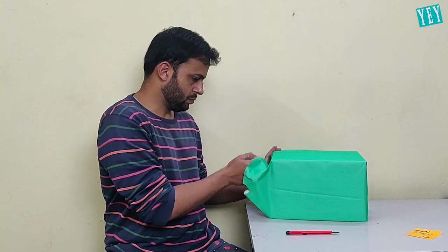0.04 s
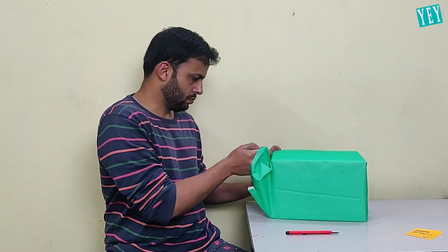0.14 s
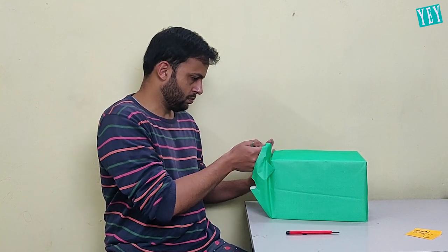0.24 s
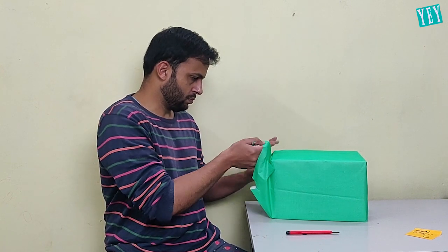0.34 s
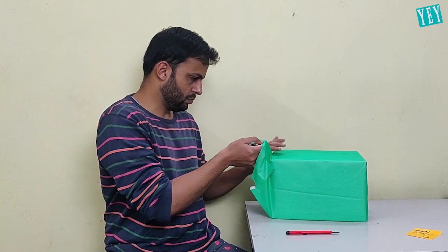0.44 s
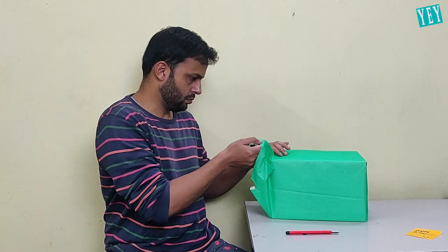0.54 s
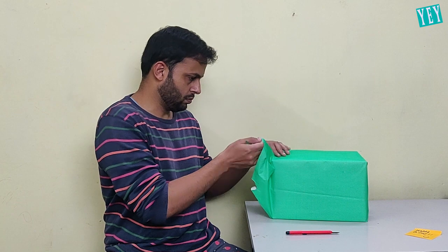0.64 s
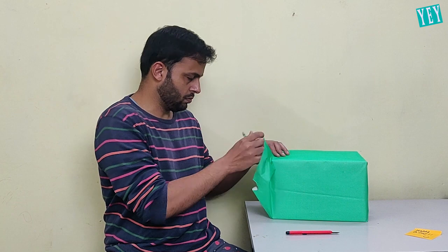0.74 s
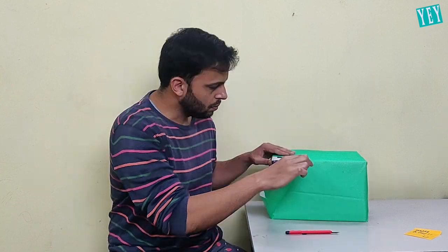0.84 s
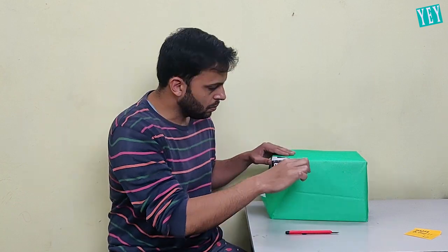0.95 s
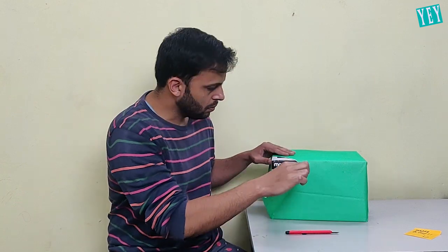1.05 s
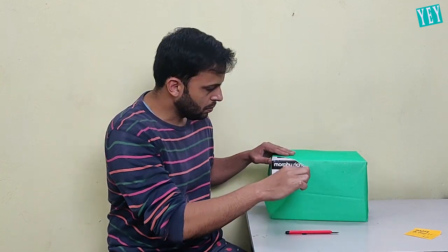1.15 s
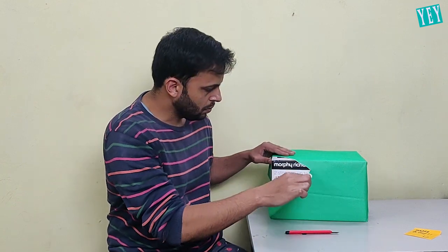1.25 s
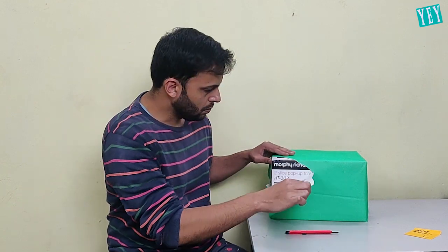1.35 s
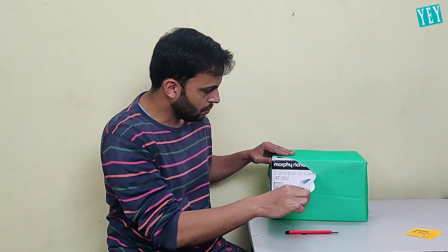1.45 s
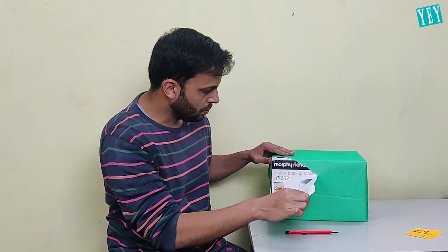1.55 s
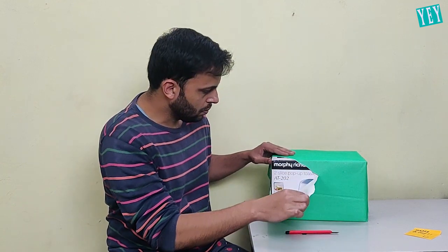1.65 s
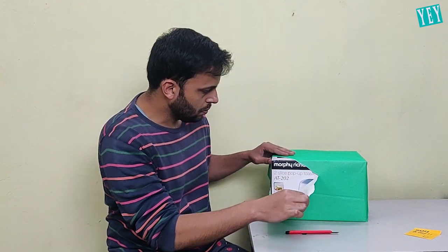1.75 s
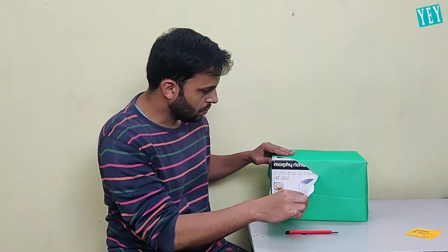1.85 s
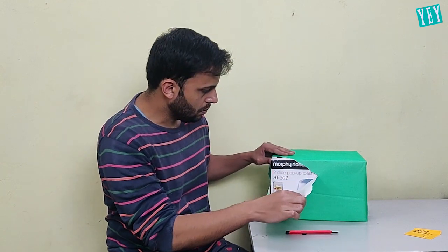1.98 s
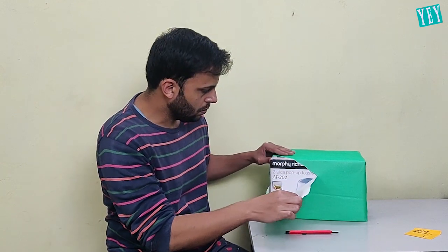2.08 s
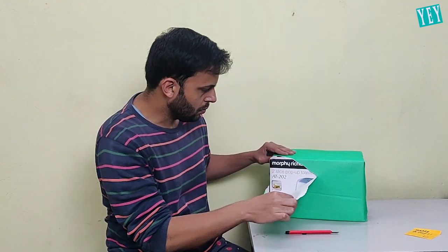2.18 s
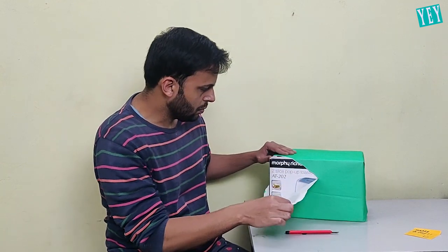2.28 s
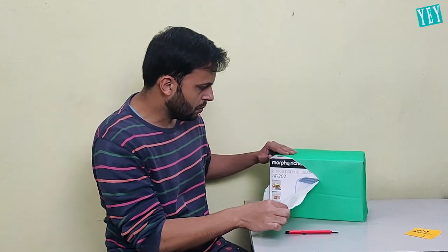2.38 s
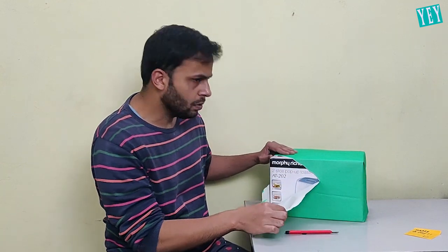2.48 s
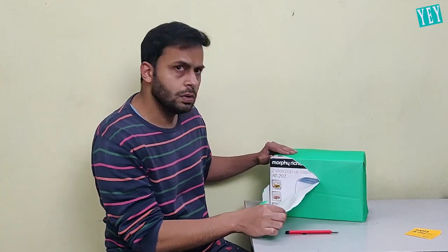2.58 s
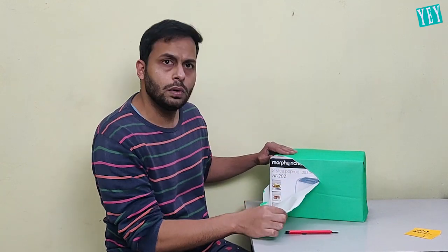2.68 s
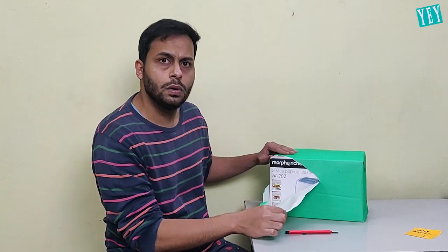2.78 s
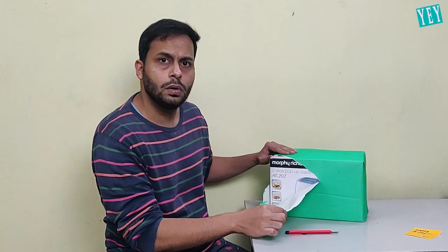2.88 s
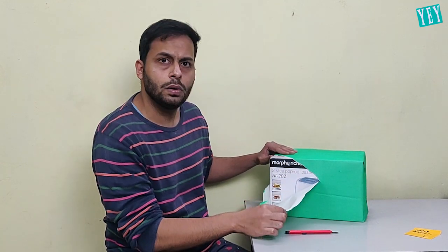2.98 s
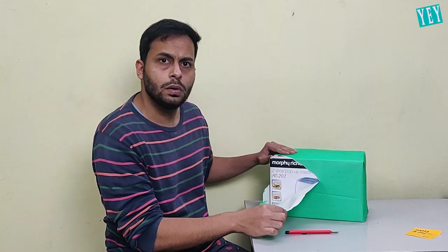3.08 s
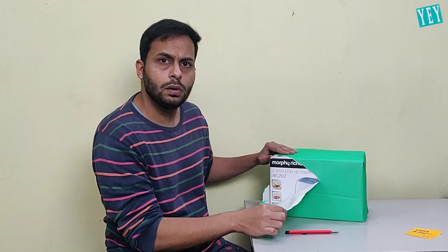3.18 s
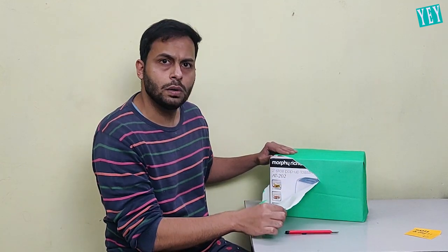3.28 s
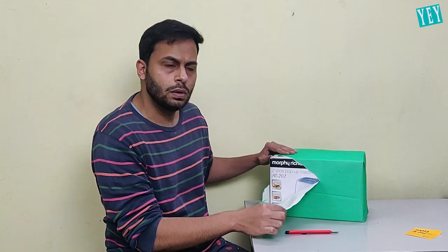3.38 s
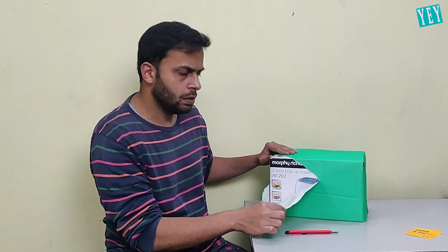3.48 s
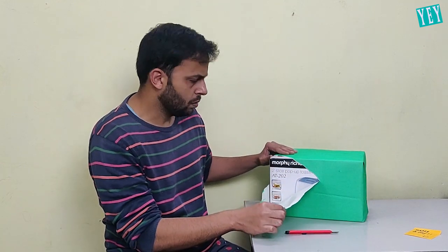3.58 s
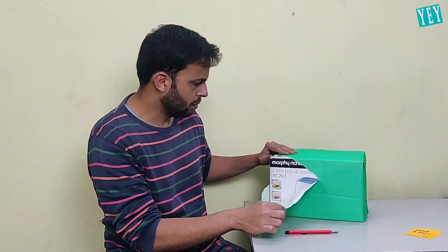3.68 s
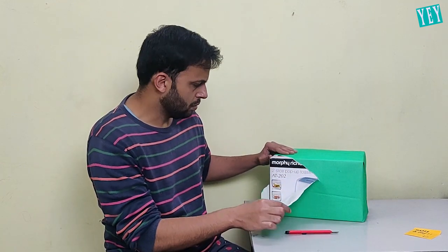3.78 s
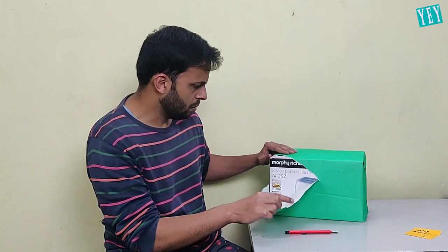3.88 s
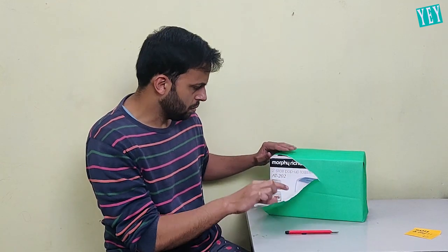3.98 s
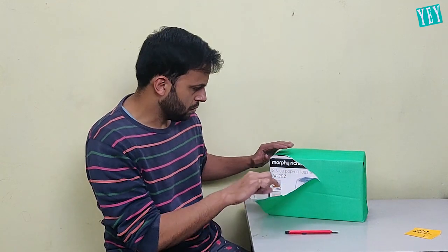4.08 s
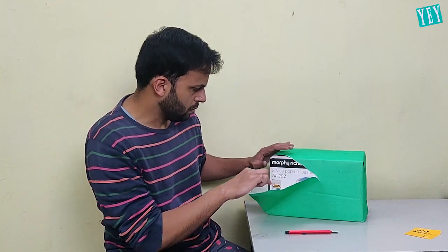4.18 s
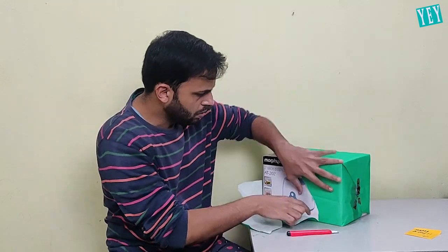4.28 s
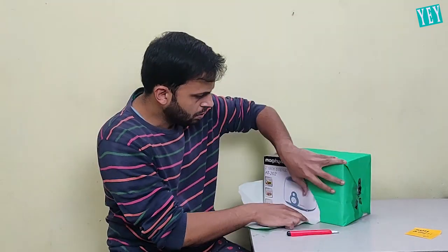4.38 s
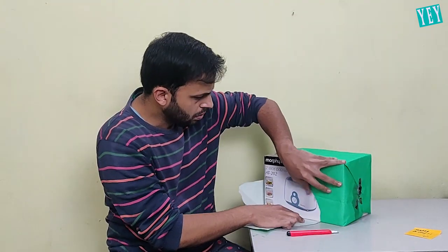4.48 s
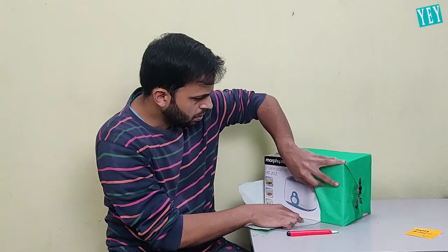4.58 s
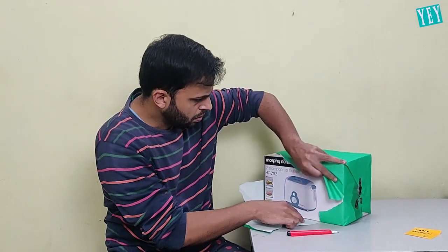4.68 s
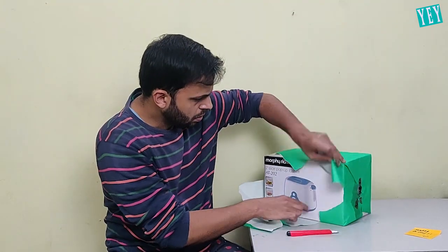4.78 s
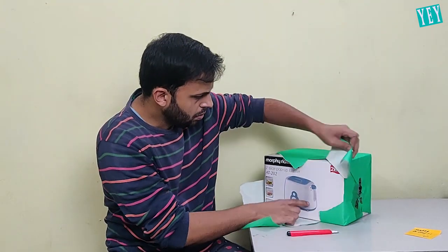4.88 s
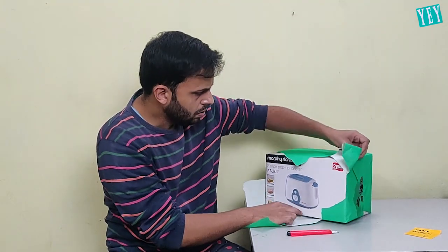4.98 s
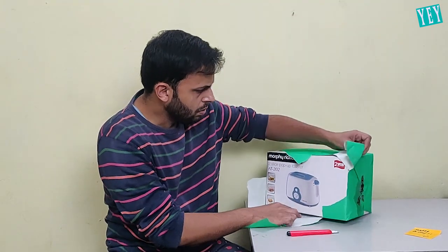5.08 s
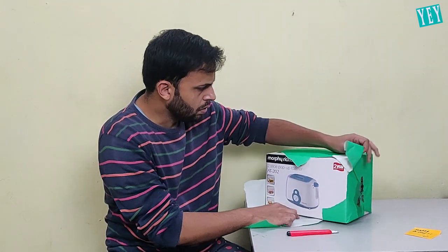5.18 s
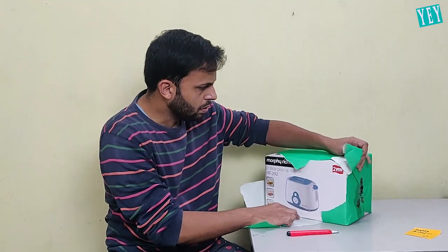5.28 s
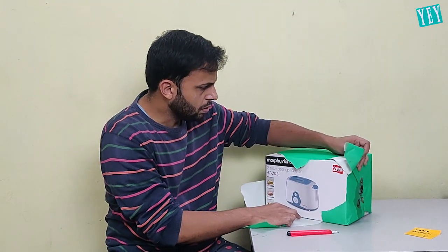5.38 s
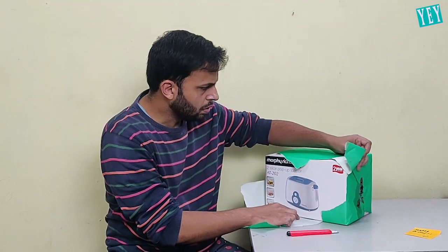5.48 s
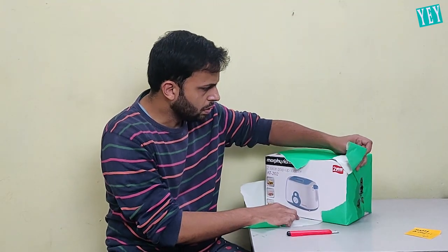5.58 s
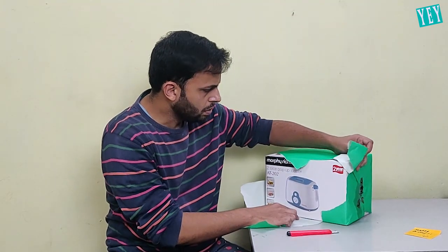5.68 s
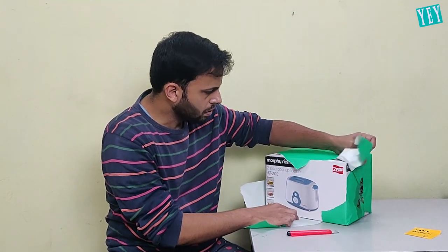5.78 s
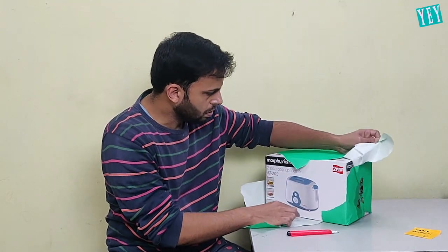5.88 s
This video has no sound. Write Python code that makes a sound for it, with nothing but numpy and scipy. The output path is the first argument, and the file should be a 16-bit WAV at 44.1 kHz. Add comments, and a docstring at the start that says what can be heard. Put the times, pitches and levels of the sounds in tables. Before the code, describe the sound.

Wrapping paper rustles open, cuts off abruptly, tears slowly twice, then is ripped off a cardboard box in two loud crackling jerks.

```python
"""Wrapping paper is pulled off a cardboard box on a table in a small bare room, over a faint low rumble.
A flap is unfolded until its sound stops short at 0.914 s; then two slow tears crackle down the side.
A hand grabs the sheet, rips it away in two strong jerks and handles it a little more.
Filtered noise of tiny fibre breaks is the sheet; short clicks are its snapping fibres and buckling creases.
Hollow knocks come from filtered impulses, and the box rings along through resonators."""
import sys
import numpy as np
from scipy import signal
from scipy.fft import rfft, irfft
from scipy.io import wavfile
from scipy.ndimage import uniform_filter1d

SR = 44100
rng = np.random.default_rng(int(sys.argv[2]) if len(sys.argv) > 2 else 0)


def generate_wav(sig):
    """Save sig (samples, or channels by samples) to the path in sys.argv[1] as 16-bit PCM at SR."""
    pcm = np.round(np.clip(np.atleast_2d(sig).T, -1, 1) * 32767).astype(np.int16)
    wavfile.write(sys.argv[1], SR, pcm)


N = 261895
TIME = np.arange(N) / SR
CUT_S = .914  # the unfolding and its echo stop abruptly here

# How the sheet radiates while it is ripped away. Each row: frequency in Hz, gain in dB.
RIP_COLOUR = [(29, -23), (50, -11), (145, -6), (246, 3.5), (408, -1), (729, 1), (1120, -0.5), (1210, -4),
              (1660, -5), (2060, -10.5), (2210, -11.5), (6870, -21.5), (8140, -21.5), (13800, -39),
              (16000, -40)]
# Band edges in Hz: a slack sheet has flapping, rustle and crackle between them.
SLACK_HZ = [45, 300, 2500, 18000]
# Band edges in Hz: a taut sheet has only rustle and crackle between them.
TAUT_HZ = [150, 2500, 18000]


def undb(db):
    """Decibels to gain."""
    return 10 ** (np.asarray(db) / 20)


def unit(x):
    """Scale to rms 1."""
    return x / np.sqrt(np.mean(x ** 2))


def add(track, s, sound):
    """Mix a sound into a track at time s."""
    start = int(s * SR)
    track[start:start + len(sound)] += sound[:N - start]


def colour(x, points):
    """Minimum-phase filter through (Hz, dB) points, built from the folded cepstrum."""
    size = 4096
    hz, db = np.transpose(points)
    bins = np.maximum(np.arange(size // 2 + 1) * SR / size, 1)
    gain = undb(np.interp(np.log(bins), np.log(hz), db))
    cepstrum = irfft(np.log(gain))
    cepstrum[1:size // 2] *= 2
    cepstrum[size // 2 + 1:] = 0
    impulse = irfft(np.exp(rfft(cepstrum)))
    return signal.fftconvolve(x, impulse)[:len(x)]


def band(x, lo_hz, hi_hz, order=3):
    """Butterworth band-pass, its upper edge kept below half the sample rate."""
    edges = [lo_hz, min(hi_hz, .47 * SR)]
    return signal.sosfilt(signal.butter(order, edges, "band", fs=SR, output="sos"), x)


def fall(t, t60):
    """Exponential decay that loses 60 dB in t60 seconds."""
    return np.exp(-np.log(1000) * t / t60)


def fade(t60):
    """The same decay as an envelope that ends after t60 seconds."""
    count = int(t60 * SR)
    return fall(np.arange(count), count)


def walk(rate):
    """Smooth random wander with spread near 1, through rate random points a second."""
    knots = rng.standard_normal(N // 20)
    return np.interp(TIME * rate, np.arange(len(knots)), knots)


def steady(x, span_s=0.11):
    """Even out the slow level and keep the grain."""
    count = int(span_s * SR)
    power = uniform_filter1d(uniform_filter1d(x ** 2, count), count)
    return x / np.sqrt(np.abs(power) + 1e-18)


def fibres(rate, spread_db, slip_db, slip_rate):
    """Rate tiny breaks a second, of unequal size, swelling and fading as the paper sticks and slips."""
    breaks = rng.random(N) < rate / SR
    sizes = undb(spread_db * np.minimum(rng.exponential(size=N), 4.5))
    signs = rng.choice([-1, 1], N)
    return breaks * sizes * signs * undb(slip_db * walk(slip_rate))


def table_bounce(x, lag_s=0.000695, sway_s=.00018, sway_hz=5, bounce=0.33):
    """The table top mirrors the moving sheet; the changing lag sweeps broad bands through its sound."""
    mirrored = np.interp(TIME - lag_s - sway_s * walk(sway_hz), TIME, x)
    return x + bounce * mirrored


def paper(gains, sheet_colour, breaks, edges):
    """Breaks shake the sheet: it flaps as a whole if slack, its facets rustle, the fibres crackle."""
    shaken = table_bounce(colour(breaks, sheet_colour))
    return sum(steady(band(shaken, lo, hi)) * gain for lo, hi, gain in zip(edges, edges[1:], gains))


def strokes(grip, flap_db, crackle_db):
    """Gains of flapping, rustle and crackle: strokes rise, hold and die; tautness trades flap for crackle."""
    # Hand strokes on the loose sheet. Each row: grip (the "grab" row at 2.6 s is the end of the second tear,
    # which shares the grabbed sheet's sound), start in seconds, rise in seconds, hold in seconds, release time
    # for 60 dB in seconds, rustle level in dB, tautness in dB of added crackle.
    hand_strokes = [("unfold", -0.029, .06, .15, 0.35, -41.5, 1),
                    ("unfold", 0.064, 0.15, 0.015, 0.38, -39.5, 0.46),
                    ("unfold", 0.29, 0.036, .02, 0.55, -42.5, 0),
                    ("pinch", 0.488, .05, .02, 0.37, -55, -2.3),
                    ("pinch", 0.588, 0.047, 0.018, 0.32, -51, -1),
                    ("pinch", 0.695, 0.068, 0.044, 0.41, -49, 0),
                    ("pinch", .865, 0.021, 0.013, 0.22, -47, -1.2),
                    ("grab", 2.6, .025, 0.011, 0.26, -63.5, 6), ("grab", 3.77, .15, .01, 0.8, -80, 8.4),
                    ("grab", 4.04, 0.032, 0.045, 0.46, -60.5, 7.8),
                    ("grab", 4.28, 0.022, 0.066, 0.36, -53, 3.3),
                    ("grab", 4.41, .075, 0.0087, 0.42, -37.5, -2.4),
                    ("grab", 4.57, 0.041, .025, 0.48, -46, -1),
                    ("rip", 4.708, 0.0032, 0.035, .2, -32.5, 2.4),
                    ("rip", 4.825, 0.041, 0.034, 0.48, -32.5, -0.64),
                    ("rip", 4.97, .04, 0.011, 0.51, -40.5, 1), ("rip", 5.1, 0.059, 0.074, .45, -51, 1.5),
                    ("last", 5.325, 0.028, .02, .4, -51.5, -5.5),
                    ("last", 5.42, 0.018, 0.017, 0.33, -49, -6.5),
                    ("last", 5.53, .05, 0.18, 0.46, -63.5, 2.2),
                    ("last", 5.68, 0.034, 0.022, .45, -52, -0.33),
                    ("last", 5.78, 0.034, 0.052, .3, -57.5, 8.4), ("last", 5.84, 0.047, .06, .3, -39, 2)]
    flap_loss = 1.4  # dB of flapping lost for each dB of tautness
    power = np.zeros((3, N))
    for name, s, rise_s, hold_s, t60, db, taut_db in hand_strokes:
        if name == grip:
            rise = np.clip((TIME - s) / rise_s, 0, 1)
            release = fall(np.maximum(TIME - s - rise_s - hold_s, 0), t60)
            shares = undb([flap_db - flap_loss * taut_db, 0, crackle_db + taut_db])
            power += np.outer(shares, undb(db) * rise * release) ** 2
    return np.sqrt(power)


def tear(pull, rustle_db, crackle_db, rustle_growth, crackle_growth):
    """Gains of rustle and crackle: a harder pull shakes more sheet, so rustle grows faster (dB per dB)."""
    full_pull_db = -45  # a tear running at full speed
    s, db = np.transpose(pull)
    effort_db = np.interp(TIME, s, db) - full_pull_db
    levels = np.array([rustle_db + rustle_growth * effort_db, crackle_db + crackle_growth * effort_db])
    return undb(levels) * (TIME >= s[0]) * (TIME < s[-1])


def unfolding():
    """The flap opens slackly, so flapping and rustle outweigh the crackle; returns the sheet."""
    # How the unfolding flap radiates. Each row: frequency in Hz, gain in dB.
    flap_colour = [(29, -37), (50, -11.5), (85, -4.5), (125, 0), (163, -6.5), (380, -6), (408, -7.5),
                   (601, -6), (1100, -19), (1210, -17.5), (5950, -23), (13200, -39), (16000, -45)]
    gains = strokes("unfold", flap_db=-0.5, crackle_db=-5.5) * (TIME < CUT_S)
    breaks = fibres(rate=6000, spread_db=2.5, slip_db=1.5, slip_rate=230)
    return paper(gains, flap_colour, breaks, SLACK_HZ)


def pinching():
    """Pinched paper rustles in short strokes; returns the sheet and its crackle gain."""
    # How the pinched sheet radiates. Each row: frequency in Hz, gain in dB.
    pinched_colour = [(29, -36), (50, -8), (87, 0), (131, 0), (167, -11), (203, -5.5), (439, -6),
                      (646, -6.5), (802, -17), (2320, -24.5), (2620, -30), (3180, -30.5), (8140, -32.5),
                      (16000, -50)]
    gains = strokes("pinch", flap_db=0, crackle_db=-7.0) * (TIME < CUT_S)
    breaks = fibres(rate=4500, spread_db=2.0, slip_db=2.5, slip_rate=110)
    return paper(gains, pinched_colour, breaks, SLACK_HZ), gains[-1]


def first_tear():
    """A slow tear in a sheet too taut to flap; returns the sheet and its crackle gain."""
    # How the sheet radiates in this tear. Each row: frequency in Hz, gain in dB.
    torn_colour = [(94, -52), (160, -25.5), (240, -8), (308, -18.5), (444, -3), (593, -1), (679, -4.5),
                   (1190, -5.5), (1680, -20.5), (1850, -17.5), (2670, -25.5), (4940, -24), (8000, -24),
                   (14300, -42), (16000, -42)]
    # Each row: time in seconds, strength of the pull in dB.
    pull = [(1.05, -63), (1.098, -55), (1.344, -43), (1.502, -45.5), (1.628, -57), (1.744, -61),
            (1.86, -88)]
    gains = tear(pull, rustle_db=-45.5, crackle_db=-50.0, rustle_growth=1.23, crackle_growth=0.81)
    breaks = fibres(rate=2100, spread_db=2.5, slip_db=3.5, slip_rate=300)
    return paper(gains, torn_colour, breaks, TAUT_HZ), gains[-1]


def second_tear():
    """Another slow taut tear, brighter and with equal-sized breaks; returns the sheet and crackle gain."""
    # How the sheet radiates in this tear. Each row: frequency in Hz, gain in dB.
    torn_colour = [(94, -52.5), (160, -4.5), (202, -5), (339, -9.5), (388, -1.5), (571, -5.5), (906, -3.5),
                   (1100, -10.5), (2200, -15.5), (4940, -3), (5540, -10.5), (8980, -10), (11500, -22.5),
                   (12900, -16), (16000, -35)]
    # Each row: time in seconds, strength of the pull in dB.
    pull = [(1.97, -74), (2.072, -69.5), (2.33, -53.5), (2.388, -46), (2.556, -61), (2.6, -73)]
    gains = tear(pull, rustle_db=-45, crackle_db=-47.5, rustle_growth=1.2, crackle_growth=.9)
    breaks = fibres(rate=2500, spread_db=0.0, slip_db=5.5, slip_rate=260)
    return paper(gains, torn_colour, breaks, TAUT_HZ), gains[-1]


def grabbing():
    """The second tear's end at 2.6 s and the grabbed sheet crumple with dense breaks; returns the sheet and its
    crackle gain."""
    # How the crumpling sheet radiates. Each row: frequency in Hz, gain in dB.
    crumple_colour = [(35, -39.5), (60, -24), (256, -7), (301, -12), (398, -2.5), (458, -6), (882, -3.5),
                      (2250, -20.5), (5090, -20), (8920, -23.5), (11000, -42), (13600, -32), (16000, -42)]
    gains = strokes("grab", flap_db=-5, crackle_db=-7)
    breaks = fibres(rate=6200, spread_db=3.0, slip_db=3.5, slip_rate=140)
    return paper(gains, crumple_colour, breaks, SLACK_HZ), gains[-1]


def ripping():
    """The sheet is ripped away with loud, crackling strokes; returns the sheet."""
    gains = strokes("rip", flap_db=-3, crackle_db=-1.5)
    breaks = fibres(rate=4500, spread_db=3.5, slip_db=2.5, slip_rate=190)
    return paper(gains, RIP_COLOUR, breaks, SLACK_HZ)


def last_handling():
    """The last strokes on the sheet rustle with little flapping; returns the sheet."""
    # How the sheet radiates at the end. Each row: frequency in Hz, gain in dB.
    last_colour = [(59, -44), (100, -6), (244, -1), (358, -9.5), (442, 0), (736, 1.5), (970, -6.5),
                   (1390, -5), (1520, -9), (3190, -14), (6420, -14.5), (7770, -14.5), (12900, -29.5),
                   (16000, -34)]
    gains = strokes("last", flap_db=-12.5, crackle_db=-5.0)
    breaks = fibres(rate=2600, spread_db=2.0, slip_db=3.0, slip_rate=210)
    return paper(gains, last_colour, breaks, SLACK_HZ)


def jerks(level_db):
    """The taut sheet gives all at once: a dense run of breaks that dies away as it slackens."""
    # The sheet jerks free. Each row: start in seconds, relative peak in dB, run-out time for 60 dB in seconds.
    jerk_rows = [(3.557, -37.5, 0.17), (4.712, -5, 0.1), (4.851, -9.5, 0.26)]
    out = np.zeros(N)
    run = unit(colour(fibres(rate=7000, spread_db=6, slip_db=12.5, slip_rate=250), RIP_COLOUR))
    for s, db, run_s in jerk_rows:
        decay = fade(run_s)
        burst = run[int(s * SR):][:len(decay)] * decay
        add(out, s, undb(db + level_db) * burst / np.abs(burst).max())
    return out


def click(hz, octaves, ring_s, flutter, crack_db):
    """One sharp crack; the facets around it flutter for a few milliseconds. Peak 1."""
    reach, decay = 2 ** octaves, fade(ring_s)
    push = flutter * rng.standard_normal(len(decay)) * decay
    push[0] += 1
    body = band(push, hz / reach, hz * reach, order=2)
    crack = octaves * undb(crack_db) * band(push, 920, 7600, order=2)
    sound = body + crack
    return sound / np.abs(sound).max()


def snap(hz):
    """A fibre bundle breaks with a short bright crack; thick bundles ring lower and narrower."""
    octaves = min((hz / 7000) ** 2, 1)  # from 7 kHz up it spreads an octave to each side
    return click(hz, octaves, ring_s=.0095, flutter=0.27, crack_db=-3.5)


def pop(hz, octaves=1):
    """A crease flips over with a lower, rounder pop."""
    return click(hz, octaves, ring_s=0.018, flutter=.45, crack_db=-19)


def play(rows, sound, level_db):
    """One sound for each row of time in seconds, relative peak in dB and the sound's own settings."""
    out = np.zeros(N)
    for s, db, *settings in rows:
        add(out, s, undb(db + level_db) * sound(*settings))
    return out


def scatter(sound, gain, rate, hz, over_db, spread_db=2, spread_octaves=0.18):
    """Small breaks at jittered steps, about rate a second, as strong as the paper is worked just then."""
    out = np.zeros(N)
    chance = rng.standard_normal((400, 3))
    for k, (shift, size, pitch) in enumerate(chance):
        s = (k + shift / 2) / rate
        strength = np.interp(s, TIME, gain, left=0, right=0)
        if strength > gain.max() / 20:  # barely worked paper stays whole
            peak = strength * undb(over_db + spread_db * size)
            add(out, s, peak * sound(hz * 2 ** (spread_octaves * pitch)))
    return out


def snapping(pinch, first, second):
    """Thick fibre bundles give way at set times, smaller ones at random as the crackle gains rise."""
    # The thickest bundles. Each row: time in seconds, relative peak in dB, pitch in Hz.
    thick_bundles = [(.337, -33, 6000), (.3965, -43, 6200), (.4228, -38, 8100), (.5032, -40.5, 6800),
                     (.611, -38, 7100), (.6512, -41.5, 6700), (1.1565, -33, 7800), (1.3565, -25.5, 6560),
                     (1.443, -34, 6600), (1.494, -29.5, 6300), (1.5844, -26, 6740), (1.6661, -32, 5700),
                     (1.6975, -34, 5640), (1.748, -33, 6000), (2.147, -41, 6370), (2.3085, -36, 5700),
                     (2.3637, -30.5, 4750), (2.3838, -25.5, 4630), (2.4129, -28.5, 4500),
                     (2.5043, -35.5, 4740), (2.624, -40.5, 4800), (4.4884, -28.5, 6400),
                     (4.6298, -18, 5600), (4.7097, -15, 6150), (4.7244, -13, 5700), (4.8181, -18.5, 6300),
                     (4.8592, -17, 7500), (4.8894, -19.5, 5800), (5.0244, -23, 3500)]
    cracks = play(thick_bundles, snap, level_db=0.5)
    cracks += scatter(snap, pinch, rate=40, hz=7860, over_db=10.5)
    cracks += scatter(snap, first, rate=31, hz=6300, over_db=12)
    cracks += scatter(snap, second, rate=60, hz=4860, over_db=10)
    return cracks


def creasing(grab):
    """Creases buckle at set times, and smaller ones at random as the second tear ends and while the sheet is
    grabbed."""
    # The loudest creases and small ticks.
    # Each row: time in seconds, peak in dB, pitch in Hz, half-width in octaves.
    loud_creases = [(.2133, -25.5, 2380, 0.86), (.8805, -32.5, 1950, 0.91), (1.029, -38.5, 2170, 0.91),
                    (1.889, -61, 3230, 0.061), (1.9508, -49, 1450, 0.28), (3.1492, -66, 2680, 0.26),
                    (3.564, -39.5, 4300, 1.08), (4.0802, -40.5, 2554, 0.43), (4.134, -41, 2100, 1),
                    (4.2851, -38.5, 1560, 0.72), (4.3061, -31.5, 1870, 1.15), (4.3416, -25, 1780, 1.15),
                    (4.3549, -30, 1700, 1.2), (4.4244, -31, 3600, 0.32), (4.4388, -26, 1800, 1.2),
                    (4.4823, -25, 2100, 0.95), (4.5524, -28.5, 1910, 1.07), (4.599, -29.5, 2750, 0.64),
                    (4.7146, -13.5, 3350, 1.3), (4.7609, -21, 4300, .5), (4.852, -17.5, 2100, 1.5),
                    (4.8681, -19, 1990, 0.77), (5.428, -32.5, 1500, 1.09), (5.6462, -43, 1210, 0.37),
                    (5.7903, -35.5, 2850, 1.4), (5.804, -37, 1610, .6), (5.8684, -28, 2600, 0.45)]
    return play(loud_creases, pop, level_db=0) + scatter(pop, grab, rate=27, hz=2100, over_db=10)


def knocks(level_db=-1, below=2.13, above=1.27, rattle_db=-19, rattle_s=0.058, panel_db=-5):
    """A soft blow dents the cardboard with one dead thud; the panel rings and the loose wrapping rattles."""
    # Side panel of the box. Each row: frequency in Hz, level in dB, free ring time for 60 dB in seconds.
    panel_modes = [(414, 1, 0.16), (607, -13.5, 0.11), (788, -3, 0.15)]
    # Hands and sheet bumping the box. Each row: time in seconds, relative level in dB, pitch of the blow in Hz.
    blows = [(1.888, -45.5, 369), (3.149, -60, 451), (3.564, -43.5, 473), (4.381, -22, 99),
             (4.619, -41.5, 284.0), (4.711, -23.5, 447), (4.869, -31.5, 378.0), (5.345, -37, 254.0),
             (5.43, -36.5, 432.0), (5.895, -32, 450.0)]
    out, count = np.zeros(N), SR // 4
    t = TIME[:count]
    # the ring time is held to 0.07 s at most
    panel = sum(undb(db) * np.sin(2 * np.pi * hz * t) * fall(t, min(t60, .07)) for hz, db, t60 in panel_modes)
    panel /= np.abs(panel).max()
    for s, db, hz in blows:
        thud = band(signal.unit_impulse(count), hz / below, hz * above, order=1)
        thud = band(thud, 30, 1210, order=2)  # a gentle low edge keeps the thud from booming on
        decay = fade(rattle_s)
        rattle = unit(band(rng.standard_normal(count), 280, 940, order=2))[:len(decay)] * decay
        # slow, low blows hardly reach the panel's modes
        ring = undb(panel_db) * min(hz / 350, 1) * panel
        add(out, s, undb(db + level_db) * (thud / np.abs(thud).max() + ring))
        add(out, s, undb(db + level_db + rattle_db) * rattle)
    return out


def box(x):
    """The paper lies on the box, which rings along in narrow resonances."""
    # Cardboard and the air in it. Each row: frequency in Hz, width in Hz, gain in dB over the direct sound.
    box_modes = [(86.5, 12, -7), (206, 15, -11.5), (250, 9.4, -3), (548, 13, -17), (741, 30, -8),
                 (834, 45, -7), (1140, 8.2, -17), (1246, 22, -12.5), (1700, 7.5, -12), (1867, 13, -10),
                 (1872, 18, -8.5), (2090, 9.3, -8)]
    return x + sum(undb(db) * signal.lfilter(*signal.iirpeak(hz, hz / width, fs=SR), x)
                   for hz, width, db in box_modes)


def room(x, wet_db, low_t60=0.41, mid_t60=0.34, high_t60=0.28, gap_s=0.003, sway_hz=3):
    """Bare plaster walls return a short bright wash; its pattern shifts as the sheet and arms move."""
    t = TIME[:SR * 2 // 3]
    decays = [(61, 520, low_t60), (544, 3470, mid_t60), (4630, 24000, high_t60)]
    out = x.copy()
    # three noise tails take turns; the squares of their shares always sum to 1
    for turn in np.arange(3) * np.pi / 3:
        tail = sum(band(rng.standard_normal(len(t)), lo, hi, order=2) * fall(t, t60) for lo, hi, t60 in decays)
        tail *= t > gap_s
        tail /= np.sqrt(np.sum(tail ** 2))
        share = np.sqrt(2 / 3) * np.cos(2 * np.pi * sway_hz * TIME + turn)
        out += undb(wet_db) * signal.fftconvolve(x * share, tail)[:N]
    return out


def air(level_db=-65.5, waver_db=-2.0):
    """Faint low rumble of the house: coloured noise with a wavering level."""
    # Spectrum of the quiet room. Each row: frequency in Hz, relative density in dB per Hz.
    air_colour = [(12, -34.5), (20, -1), (49, -7), (91, -5.5), (123, -2.5), (138, -18), (154, -14),
                  (255, -20), (301, -23), (328, -23.5), (678, -33), (3250, -49.5), (16000, -59.5)]
    rumble = unit(colour(rng.standard_normal(N), air_colour))
    return rumble * undb(level_db + waver_db * walk(7.8))


def scene():
    """Strokes, tears, clicks and knocks in the room; the unfolding and its echo end abruptly."""
    pinch_sheet, pinch = pinching()
    first_sheet, first = first_tear()
    second_sheet, second = second_tear()
    grab_sheet, grab = grabbing()
    sheet = unfolding() + pinch_sheet + first_sheet + second_sheet + grab_sheet + ripping() + last_handling()
    sheet = box(sheet + jerks(level_db=-7.0))
    cracks = snapping(pinch, first, second)
    creases = box(creasing(grab))
    out = air() + room(box(knocks()), wet_db=-2.0)
    # gating the echoes too lets none of the unfolding ring past its end
    for part in (TIME < CUT_S, TIME >= CUT_S):
        out += part * room(sheet * part, wet_db=-6)
        out += part * room(cracks * part, wet_db=-9.5)
        out += part * room(creases * part, wet_db=-2.5)
    return out[None]


def record(dry):
    """A steep elliptic low-pass removes the treble above 15.9 kHz."""
    return signal.sosfilt(signal.ellip(10, .2, 70, 15900, fs=SR, output="sos"), dry)


dry = scene()
out = record(dry)
generate_wav(out)
```